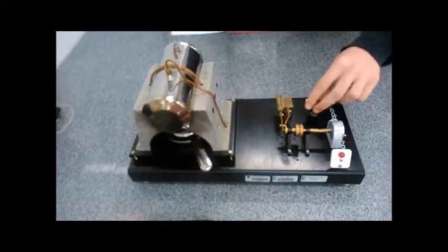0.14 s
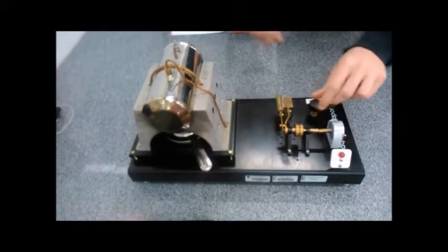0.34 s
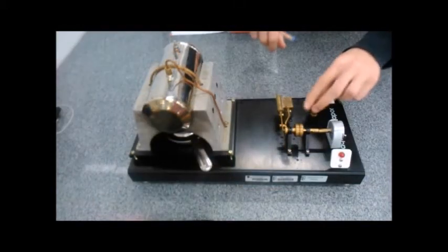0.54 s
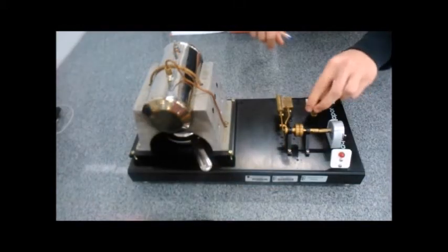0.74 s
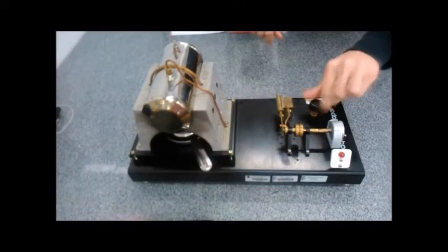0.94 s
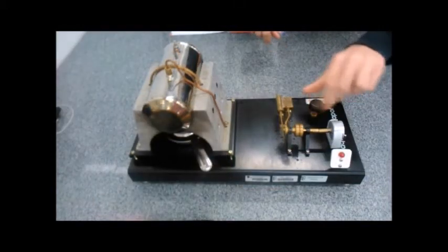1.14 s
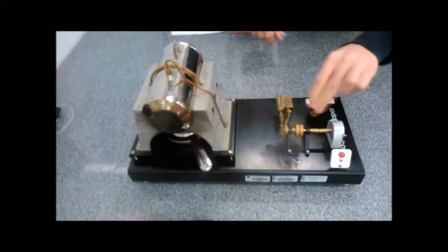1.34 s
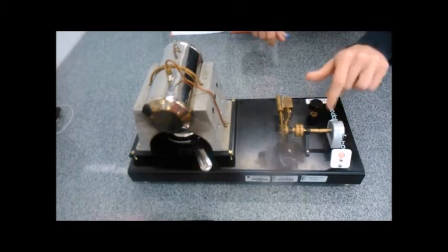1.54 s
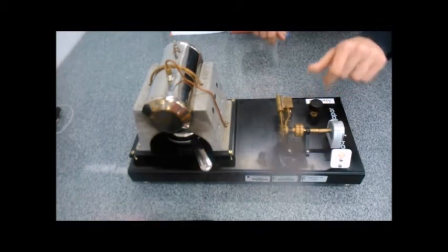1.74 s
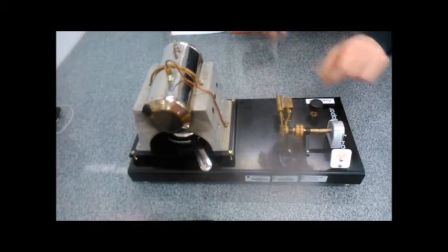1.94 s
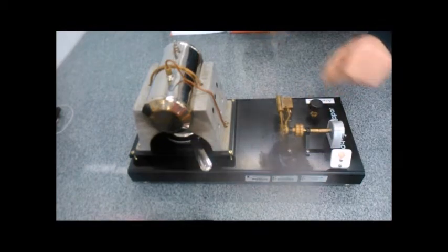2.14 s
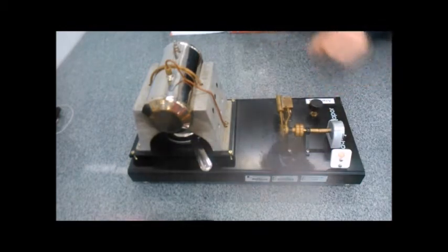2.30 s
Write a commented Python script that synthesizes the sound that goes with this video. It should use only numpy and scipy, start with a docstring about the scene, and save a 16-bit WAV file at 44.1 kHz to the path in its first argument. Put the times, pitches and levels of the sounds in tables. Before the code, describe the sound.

A model steam engine, close and mono in a reflective lab. Quiet room rumble and soft handling bumps last until 0.55 s, then sound drops out, leaving tiny ticks. Faint handling returns near 0.8 s, with a thin squeak around 0.9. Steam bursts in at about 1 s, hissing and spitting; uneven first knocks settle by 1.5 s into rapid, even metallic clatter, about sixteen per second, continuing to the end.

```python
"""A model steam engine on a lab bench, close to a mono microphone: about sixteen piston knocks a second.
Each knock is a chatter of metal clicks ringing shell, linkage, valve and tin base, with a puff and a thud.
Steam is shaped noise that hisses, fizzes and spits; dense short reflections put the engine in the lab.
First come quiet room air and fingers on the valve, as shaped noise, decaying tones and a faint squeak;
the sound drops out for a moment, leaving tiny ticks, and returns before the steam starts."""
import sys
import numpy as np
from scipy import signal
from scipy.fft import rfft, irfft
from scipy.io import wavfile
from scipy.ndimage import uniform_filter1d

SR = 44100
rng = np.random.default_rng(int(sys.argv[2]) if len(sys.argv) > 2 else 0)


def log_audio(samples):
    """Write samples as a 16-bit WAV file to the path given in sys.argv[1]."""
    # one column per channel
    frames = np.atleast_2d(samples).T
    # limit to full scale, then quantise
    limited = np.clip(frames, -1, 1)
    pcm = np.round(limited * 32767).astype(np.int16)
    wavfile.write(sys.argv[1], SR, pcm)


N = 104561

# piston knocks: start_s, shell_db, linkage_db, valve_db, base_db, chatter_decay_s
KNOCKS = [(1.081, -24, -27.5, -40, -36, 0.0052), (1.171, -35.5, -39, -60, -45, 0.0013),
          (1.204, -27.5, -29.5, -37, -34.5, 0.005), (1.268, -25.5, -27, -33.5, -23.5, 0.0054),
          (1.321, -38, -33.5, -31.5, -50, 0.0054), (1.328, -28, -33, -37.5, -30.5, 0.0067),
          (1.365, -37.5, -35, -37, -41, 0.0031), (1.407, -27, -30, -31.5, -39.5, 0.0068),
          (1.484, -33, -30.5, -35, -35.5, 0.0048), (1.494, -31.5, -32.5, -52, -44, 0.0039),
          (1.553, -29.5, -33, -33, -34.5, 0.005), (1.615, -39, -31, -33.5, -39, 0.0076),
          (1.68, -36, -31.5, -31.5, -33, 0.0028), (1.742, -29, -31, -31.5, -42, 0.01),
          (1.806, -29, -27.5, -29.5, -35, 0.0023), (1.868, -33, -31.5, -33.5, -32, 0.0069),
          (1.928, -36, -34, -34, -34.5, 0.01), (1.987, -33.5, -32, -33, -37.5, 0.016),
          (2.051, -31.5, -32, -31, -33, 0.0083), (2.114, -39, -31, -32.5, -34.5, 0.013),
          (2.177, -32.5, -29, -30, -39.5, 0.0094), (2.243, -30, -33, -35, -40.5, 0.012),
          (2.307, -31, -29, -30.5, -32, 0.0052), (2.363, -34, -42, -35, -41, 0.0032)]
# ringing parts of the engine, and the bench top under it: pitch_hz, width_hz, level_db
SHELL_MODES = [(1085, 75, 4.5), (1164, 44, -3.5), (1233.3, 55, 6), (1374, 57, -2), (1491, 49, -3.5)]
LINKAGE_MODES = [(1800, 55, -1), (2026, 45, 1), (2294, 160, -1), (2753, 135, 5), (3220, 170, 1),
                 (3452, 100, 3), (3800, 430, -2.5), (4460, 150, -2)]
VALVE_MODES = [(4895, 170, 2), (5630, 140, -1.5), (6040, 59, 2.5), (6490, 410, 4.5), (7150, 240, -1.5),
               (9180, 1700, 8.5)]
BASE_MODES = [(400, 18, -10), (517.7, 34, -6.5), (595.5, 35, -9), (743, 65, -16), (860, 93, 1)]
BENCH_MODES = [(139.3, 18.6, 4.5), (81, 17, -3)]
# exhaust puff spectrum: frequency_hz, level_db (per Hz)
PUFF_SPECTRUM = [(300, -20), (700, 0), (2000, -1.5), (5000, -9), (7500, -20), (11000, -20), (14000, -28)]
# steam and running rattle over time: time_s, hiss_db, rattle_db, fizz_db
STEAM_LEVELS = [(.955, -82, -101, -72), (.98, -58.5, -59, -57), (1.0, -41.5, -44.5, -37.5),
                (1.06, -38.5, -45, -52), (1.12, -37, -55.5, -41), (1.2, -39.5, -47, -40.5),
                (1.3, -38, -43.5, -40.5), (1.45, -36.5, -40.5, -50), (1.8, -37, -40, -43),
                (2.37, -35.5, -43.5, -49)]
# spits of wet steam: start_s, level_db, decay_s
SPITS = [(1.066, -31.5, 0.018), (1.119, -28.5, 0.0027), (1.129, -30, 0.011), (1.167, -32.5, 0.0077),
         (1.262, -35, 0.003), (1.503, -33, 0.0072)]
# spectra of hiss, fine fizz and spits: frequency_hz, level_db (per Hz)
HISS_SPECTRUM = [(24, -38), (45, -10), (140, -9), (300, -9), (700, -6), (1260, -14.5), (1600, -4),
                 (2750, -7.5), (4200, -6.5), (6500, -13), (9800, -10), (13800, -17)]
FIZZ_SPECTRUM = [(5500, -36), (8000, 7), (10000, 5.5), (12000, 7.5), (14000, 2)]
SPIT_SPECTRUM = [(3000, -6.5), (6000, -1.5), (9000, 3.5), (12000, -4), (14000, -5)]
# quiet room over time: time_s, rumble_db, handling_db, air_db
ROOM_LEVELS = [(0.0, -55, -69, -79), (0.01, -59, -67.5, -68), (0.094, -59.5, -63.5, -65.5),
               (0.18, -56.5, -66, -65.5), (0.304, -66, -61.5, -66), (0.344, -62, -61.5, -67),
               (0.488, -58, -65, -65.5), (0.524, -47, -62.5, -62.5), (0.544, -56, -63, -68),
               (0.558, -92, -88, -80.5), (0.59, -93, -87, -78.5), (0.62, -100, -100, -95),
               (0.735, -100, -98, -92), (0.79, -78, -71, -75), (0.806, -69, -55.5, -75),
               (0.856, -65, -67.5, -75.5), (0.956, -78, -72, -75), (0.97, -96, -60, -68)]
# spectra of rumble, handling and air: frequency_hz, level_db (per Hz)
RUMBLE_SPECTRUM = [(25, -10.5), (50, -1), (90, -15.5), (150, -19), (300, -69)]
HANDLING_SPECTRUM = [(80, -20), (150, -2), (300, 1), (550, -6), (800, -12.5), (1500, -32)]
AIR_SPECTRUM = [(530, -7), (900, -1), (1090, -3), (2110, -3), (2340, -4), (4230, -10.5), (12200, -9.5),
                (15100, -18)]
# soft bumps through the bench: start_s, pitch_hz, level_db, t60_s
BUMPS = [(.078, 50.6, -48, 0.51), (.11, 603, -57, .15), (.27, 596, -57, 0.13), (0.328, 257, -48, 0.041),
         (.3, 518, -57.5, 0.35), (.42, 564, -59, 0.17), (0.521, 80, -50, 0.027), (.522, 380, -52, 0.051),
         (.8, 255, -60.5, 0.2), (0.87, 203, -60, 0.037)]
# tiny dull ticks in the dropout: time_s, peak_db, width_s
TICKS = [(.57, -64, 0.00036), (.58, -63, 0.00054), (.612, -66, 0.00011), (.626, -65, 0.00015),
         (.6435, -74, 0.00017), (.655, -75, 0.00018), (.6795, -66.5, 0.00019), (.755, -64, 0.00023),
         (.7655, -65, .0005)]

KNOCK_RISE_S, CONTACTS_PER_S = 0.0048, 4000
BOUNCE_DECAY_S, BOUNCE_DB = 0.0069, -18.5  # level relative to the knock
LEAD_S, LEAD_DB = 0.02, -12  # lead-in scrape, relative to the knock
DETUNE = 0.016  # share by which each knock pulls the tones of a part
RATTLE_PER_S = 2500
PUFF_DB, BENCH_DB = -7, -15.5  # relative to the linkage level of each knock
STEAM_ON_S, MACHINE_TOP_HZ = 0.93, 13930
LAB_T60_S, LAB_DB = 0.81, -10  # tail level relative to the direct sound
DROP_S = 0.546  # bumps already ringing are cut here
BRUSH_S, BRUSH_DB = 0.492, -64
SQUEAK_S, SQUEAK_LEN_S, SQUEAK_HZ, SQUEAK_WIDTH_HZ, SQUEAK_DB = 0.868, 0.1, 3645, 55, -71
EDGE_HZ = 15300  # top of the whole sound

time_s = np.arange(N) / SR


def amp(db):
    """Decibels to gain."""
    return 10 ** (np.asarray(db) / 20)


def evened(x):
    """Scale to an RMS of one."""
    return x / np.sqrt(np.mean(x ** 2) + 1e-20)


def curve(table, column):
    """A level column as gain over time."""
    rows = np.array(table)
    return amp(np.interp(time_s, rows[:, 0], rows[:, column]))


def burst(start_s, decay_s, rise_s):
    """Rounded rise, exponential fall."""
    t = np.maximum(time_s - start_s, 0)
    rise = np.sin(np.pi / 2 * np.minimum(t / rise_s, 1)) ** 2
    return rise * np.exp(-np.maximum(t - rise_s, 0) / max(decay_s, 1e-4))


def noise(spectrum, patchy_db):
    """Random short-time spectra with drifting patches, shaped to a spectrum, RMS one."""
    frames = N // 128 + 5
    real, imag, patches = rng.standard_normal((frames, 257, 3)).T
    patches = uniform_filter1d(patches, 6, 0)  # smooth across frequency
    patches = evened(uniform_filter1d(patches, 10, 1))  # smooth across time
    spectra = (real + 1j * imag) * amp(patchy_db * patches)
    patchy = signal.istft(spectra, nperseg=512, noverlap=384)[1][:N]
    f, db = np.transpose(spectrum)
    log_f = np.log(np.fft.rfftfreq(N, 1 / SR) + 1)
    return evened(irfft(rfft(patchy) * amp(np.interp(log_f, np.log(f), db)), N))


def contacts(per_s, spread_db):
    """Sparse metal-on-metal clicks of uneven size and random sign, RMS one."""
    size = amp(spread_db * np.minimum(rng.exponential(1, N), 4))
    sign = rng.choice([-1., 1.], N)
    return evened(size * sign * (rng.random(N) < per_s / SR))


def ring(modes, soften_s):
    """Impulse response of a part, energy one: decaying modes, wider ones dying sooner; soft contact."""
    t = np.arange(6000) / SR
    response = np.zeros(len(t))
    for k, (hz, width_hz, db) in enumerate(modes):
        tone = np.exp(-np.pi * width_hz * t) * np.sin(2 * np.pi * hz * t)
        response += (-1) ** k * amp(db) * np.sqrt(width_hz) * tone  # root of width evens the energy
    response *= 1 - np.exp(-t / soften_s)
    return response / np.linalg.norm(response)


def struck(drive, modes, soften_s):
    """A part rings under a drive signal: convolution with its impulse response."""
    return signal.oaconvolve(drive, ring(modes, soften_s))[:N]


def knock_shape(start_s, decay_s):
    """Envelope of one knock: lead-in scrape, short chatter and a softer bounce."""
    lead = amp(LEAD_DB) * burst(start_s - LEAD_S, 0.00043, LEAD_S)
    chatter = burst(start_s - 0.002, decay_s, KNOCK_RISE_S)
    bounce = amp(BOUNCE_DB) * burst(start_s + 0.013, BOUNCE_DECAY_S, 0.0047)
    return lead + chatter + bounce


def part_sound(modes, knock_db, shapes, rattle_db, soften_s):
    """One part rung by every knock, its tones pulled afresh each time, and by the loose running rattle."""
    hits = contacts(CONTACTS_PER_S, spread_db=1.5)
    loose = contacts(RATTLE_PER_S, spread_db=5.5)
    out = struck(amp(rattle_db) * curve(STEAM_LEVELS, column=2) * loose, modes, soften_s)
    pulls = 1 + DETUNE * rng.standard_normal((len(shapes), len(modes)))
    for db, shape, pull in zip(knock_db, shapes, pulls):
        pulled = [(hz * p, width_hz, mode_db) for (hz, width_hz, mode_db), p in zip(modes, pull)]
        out += struck(amp(db) * shape * hits, pulled, soften_s)
    return out


def engine():
    """Knocks and rattle excite four metal parts; each knock also puffs exhaust and thuds the bench."""
    knocks = np.array(KNOCKS)
    shapes = np.array([knock_shape(s, decay) for s, decay in knocks[:, [0, 5]]])
    shell_db, linkage_db, valve_db, base_db = knocks[:, 1:5].T
    out = part_sound(SHELL_MODES, shell_db, shapes, rattle_db=-1.5, soften_s=0.003)
    out += part_sound(LINKAGE_MODES, linkage_db, shapes, rattle_db=-4.5, soften_s=0.0003)
    out += part_sound(VALVE_MODES, valve_db, shapes, rattle_db=-8, soften_s=0.0002)
    out += part_sound(BASE_MODES, base_db, shapes, rattle_db=-4.5, soften_s=0.0015)
    out += (amp(linkage_db + PUFF_DB) @ shapes) * noise(PUFF_SPECTRUM, patchy_db=6.0)
    out = signal.lfilter(*signal.butter(2, 300, "high", fs=SR), out)  # the thud keeps its lows
    thud = contacts(CONTACTS_PER_S, spread_db=-2.0) * (amp(linkage_db + BENCH_DB) @ shapes)
    return out + struck(thud, BENCH_MODES, soften_s=0.0022)


def steam():
    """Leaking steam as turbulent noise: a broad hiss, uneven fine fizz and short wet spits."""
    hiss = curve(STEAM_LEVELS, column=1) * noise(HISS_SPECTRUM, patchy_db=1.5)
    fizz = curve(STEAM_LEVELS, column=3) * noise(FIZZ_SPECTRUM, patchy_db=3.5)
    spits = sum(amp(db) * burst(s, decay, 0.0016) for s, db, decay in SPITS)
    return hiss + fizz + spits * noise(SPIT_SPECTRUM, patchy_db=3.4)


def lab(x):
    """Dense reflections off bench and walls: a decaying noise tail."""
    t = np.arange(SR // 2) / SR
    tail = rng.standard_normal(len(t)) * amp(-60 * t / LAB_T60_S) * (t > 0.003)
    return x + amp(LAB_DB) * signal.oaconvolve(x, tail / np.linalg.norm(tail))[:N]


def bumps():
    """Soft bumps through the bench: single decaying tones, the early ones cut at the dropout."""
    out = np.zeros(N)
    for s, hz, db, t60 in BUMPS:
        tone = burst(s, t60 / np.log(1000), 0.12 / hz + 0.0046) * np.sin(2 * np.pi * hz * (time_s - s))
        out += amp(db) * tone * ((time_s < DROP_S) | (s > DROP_S))
    return out


def ticks():
    """Tiny dull ticks: narrow bell-shaped pulses, all downward."""
    return -sum(amp(db) * np.exp(-0.5 * ((time_s - s) / width) ** 2) for s, db, width in TICKS)


def fingertip_brush():
    """A fingertip brushes metal: a short burst of bright noise."""
    return amp(BRUSH_DB) * burst(BRUSH_S, 0.007, 0.005) * noise(SPIT_SPECTRUM, patchy_db=-1.0)


def squeak():
    """One faint squeak: noise through a narrow resonance, swelling and fading."""
    arch = np.sin(np.pi * np.clip((time_s - SQUEAK_S) / SQUEAK_LEN_S, 0, 1))
    tone = evened(struck(rng.standard_normal(N), [(SQUEAK_HZ, SQUEAK_WIDTH_HZ, 0)], soften_s=0.0039))
    return amp(SQUEAK_DB) * np.sqrt(abs(arch)) * tone


def room():
    """Rumble, handling and air as shaped noise under the small sounds; gone once the steam starts."""
    out = curve(ROOM_LEVELS, column=1) * noise(RUMBLE_SPECTRUM, patchy_db=4.5)
    out += curve(ROOM_LEVELS, column=2) * noise(HANDLING_SPECTRUM, patchy_db=3.0)
    out += curve(ROOM_LEVELS, column=3) * noise(AIR_SPECTRUM, patchy_db=2.1)
    out += fingertip_brush() + bumps() + ticks()
    fade = uniform_filter1d((time_s < ROOM_LEVELS[-1][0]) * 1., 900)
    return out * fade + squeak()


def low_pass(top_hz):
    """Steep low-pass filter taps."""
    return signal.firwin(511, top_hz, window=("kaiser", 9), fs=SR)


def scene():
    """The machine in the lab, without treble above its top, plus the room; both channels alike."""
    close = (engine() + steam()) * (np.arange(N) > STEAM_ON_S * SR)
    machine = signal.oaconvolve(lab(close), low_pass(MACHINE_TOP_HZ), "same")
    return np.array([machine + room()] * 2)


def record(dry):
    """Band limit: the treble of the whole sound ends at EDGE_HZ."""
    return signal.oaconvolve(dry, low_pass(EDGE_HZ)[None], "same")


dry = scene()
out = record(dry)
log_audio(out)
```